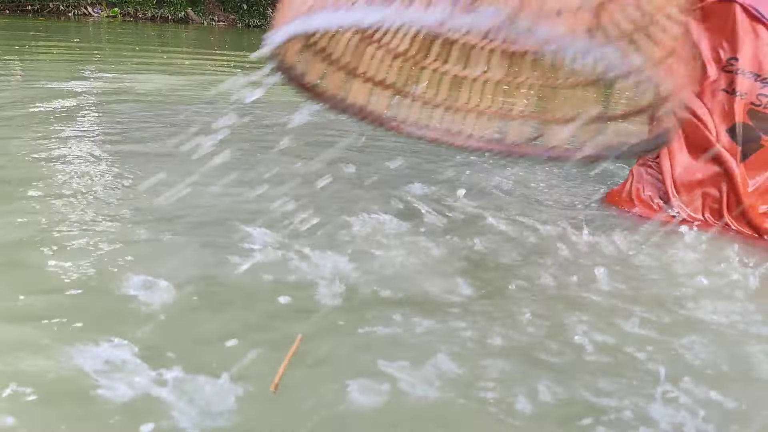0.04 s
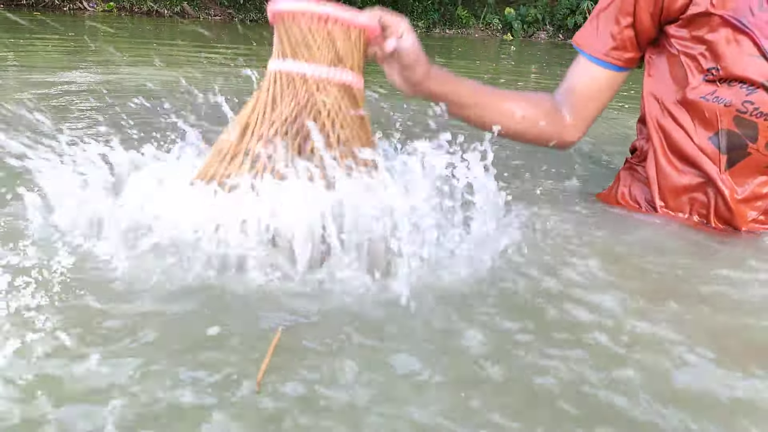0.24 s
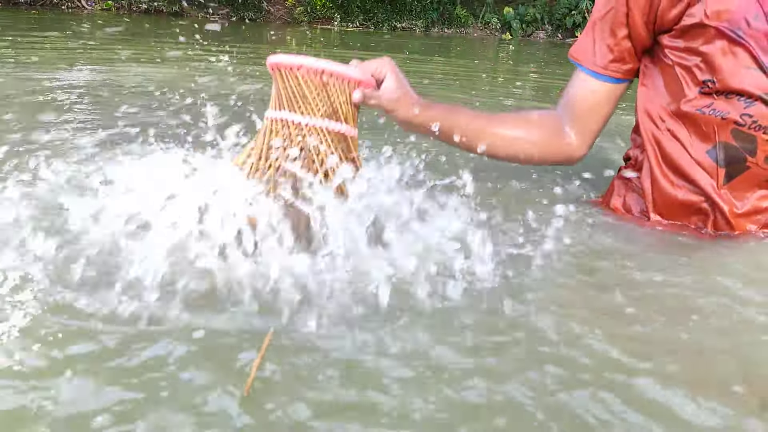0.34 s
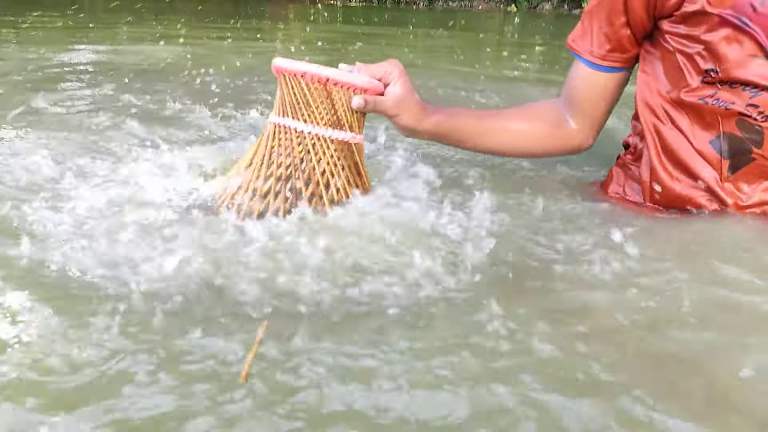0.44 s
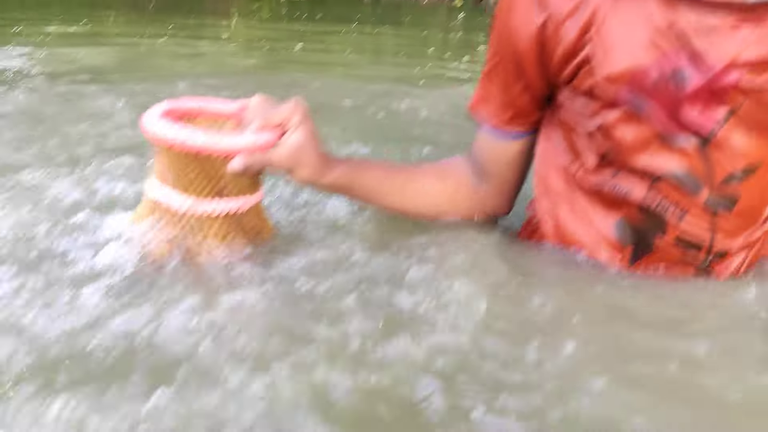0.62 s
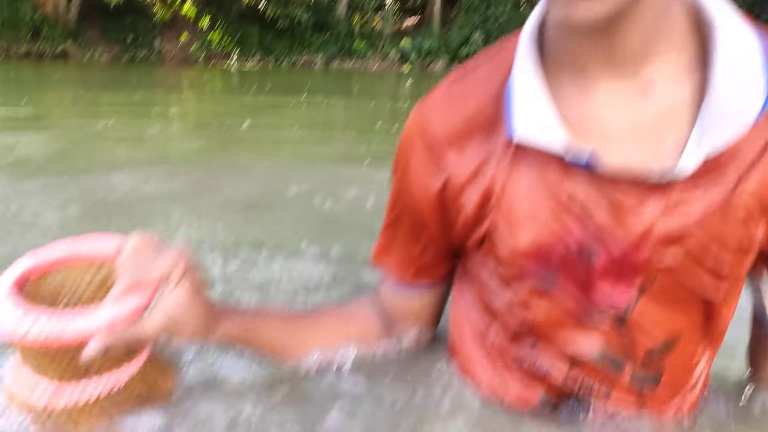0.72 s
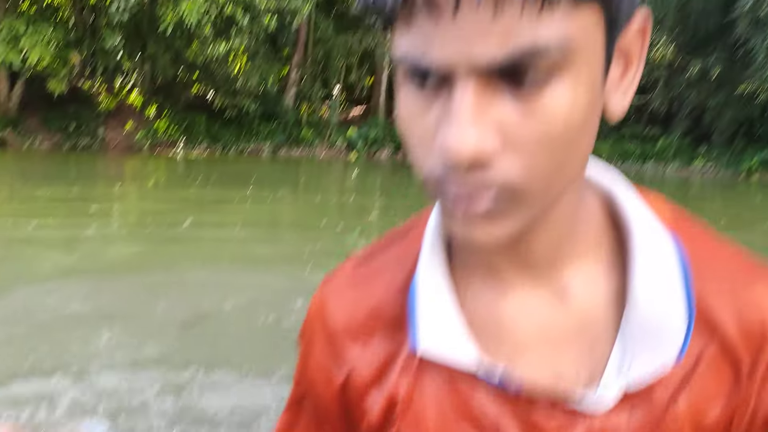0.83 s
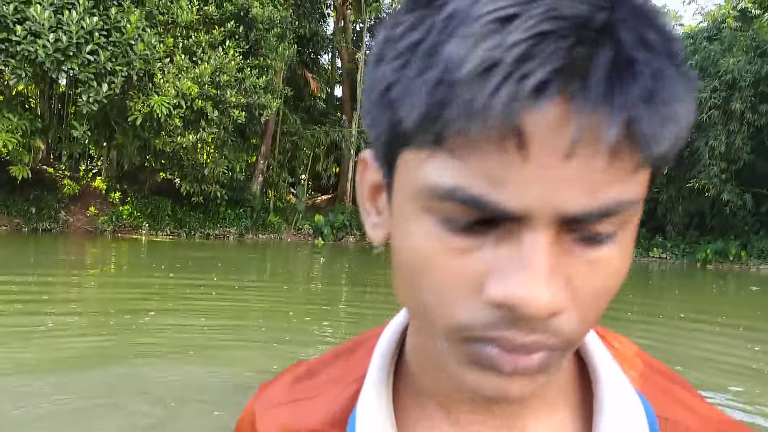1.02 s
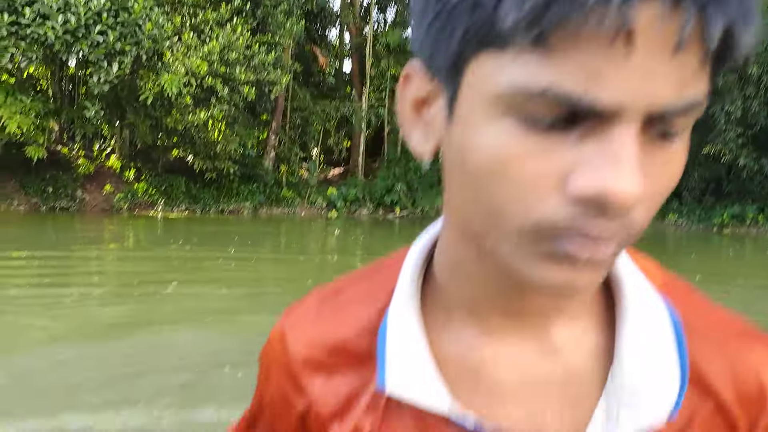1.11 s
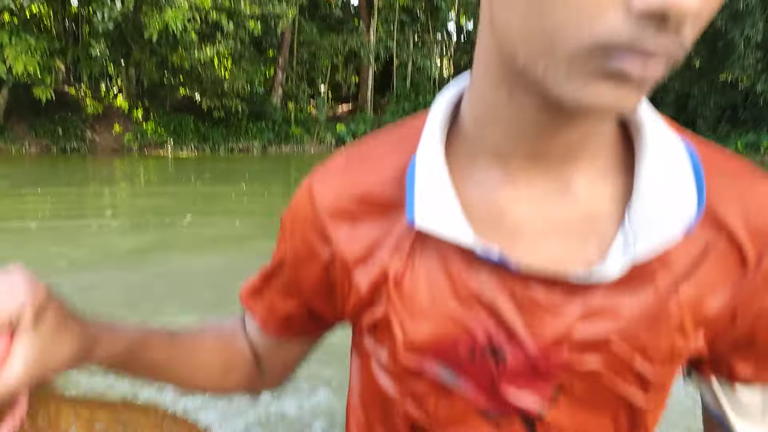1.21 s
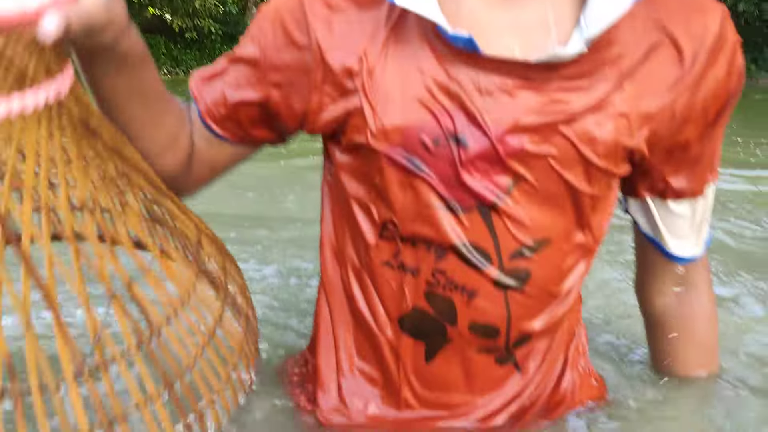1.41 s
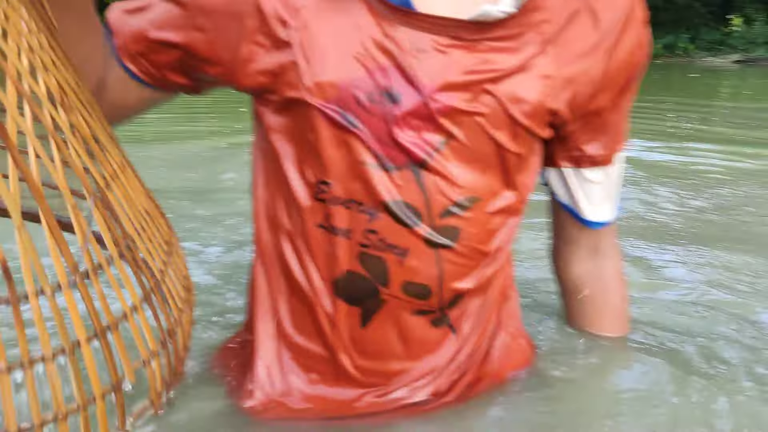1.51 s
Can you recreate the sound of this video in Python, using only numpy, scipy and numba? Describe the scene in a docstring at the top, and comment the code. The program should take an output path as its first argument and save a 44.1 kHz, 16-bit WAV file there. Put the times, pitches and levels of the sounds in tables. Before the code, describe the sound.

One brief, close splash as a bamboo basket is pushed into a shallow river, with bubbly plops and a sinking gulp, then fading foam, sparse droplets and soft draining over faint lapping; stereo phone, slight wind rumble.

```python
"""Basket trap plunged into a river

A bamboo basket trap is plunged into a shallow river, close to a phone with two microphone ports.
Spray, churning water, spray raining back, foam, trickles, draining and the river are clouds of tiny bubble rings.
Drips add a noisy tick to a ringing bubble, and an air pocket gulps shut as a sine that sinks in pitch.
Air buffets the ports as filtered noise with two low thumps."""
import sys
import numpy as np
from scipy import signal
from scipy.fft import rfft, irfft, next_fast_len
from scipy.io import wavfile
from numba import njit

SR = 44100
rng = np.random.default_rng(int(sys.argv[2]) if len(sys.argv) > 2 else 0)


def persist_wave(psi):
    """Save psi, clipped to +-1, as 16-bit WAV."""
    counts = np.round(np.clip(psi, -1, 1) * 32767).astype(np.int16)
    wavfile.write(sys.argv[1], SR, np.atleast_2d(counts).T)


N = 68355  # length in samples

# The river's steady lapping and far hiss. Each row: frequency in Hz, filter gain in dB.
RIVER_TONE = [(60, -4), (130, -1), (280, 5), (500, -4), (900, -8), (1600, -11), (3400, -4.5), (5000, -11.5),
              (8000, -11.5), (14000, -16.5)]
RIVER_DB, RIVER_FLICKER_DB = -56, 1

# Rumble of the air on the ports. Each row: frequency in Hz, filter gain in dB.
BUFFET_TONE = [(10, -12.5), (25, 2.5), (45, -7), (70, -7.5), (110, -10.5), (200, -23.5), (500, -76),
               (2000, -83)]
# How strongly air rumbles in the right port. Each row: time in seconds, level in dB.
BUFFET_RIGHT = [(0, -54), (.42, -48.5), (.5, -40.5), (.56, -36), (.595, -32.5), (.64, -46.5), (.9, -46),
                (1.15, -49.5), (1.4, -46), (1.55, -44.5)]
BUFFET_LEFT_DB = -54  # steady
# Puffs that strike the right port.
# Each row: start in seconds, pitch in Hz, level before filtering in dB, seconds to fade by 60 dB.
PUFFS = [(0.578, 59, -22.5, 0.069), (0.583, 248, -17, 0.0088)]

# Sparse gurgles and droplets after the plunge. Each row: frequency in Hz, filter gain in dB.
TRICKLE_TONE = [(150, -26), (300, -8), (550, -4), (850, 2), (1400, -6.5), (2200, -15.5), (3500, -1.5),
                (6000, -28), (14000, -22.5)]
TRICKLE_FROM_S, TRICKLE_RISE_S, TRICKLE_DB = .45, 0.051, -62.5
TRICKLE_CYCLES = 12.6  # base number of cycles a bubble rings

# Single drips and bubbles. Each row: start in seconds, pitch in Hz, level in dB,
# seconds for the ring to fade by 60 dB, level of the tick in dB relative to the ring (halved later).
DRIPS = [(.001, 2184, -43, 0.03, 10.5), (0.011, 3420, -44, 0.01, -2), (.057, 3840, -44, 0.02, 0),
         (0.07, 3280, -43.5, 0.011, 2), (.108, 3460, -42.5, .011, 0), (0.126, 3660, -43.5, .011, 5.5),
         (.135, 4200, -46, 0.014, 8.5), (0.141, 3040, -43.5, 0.021, 1), (0.164, 3600, -38, 0.012, -2),
         (0.166, 7400, -32.5, 0.01, -12), (0.19, 5670, -44, .006, 1), (.21, 3200, -29, 0.011, 2),
         (0.243, 4200, -23, 0.021, 1), (.286, 803, -11, 0.014, -30), (0.299, 1090, -16, 0.011, -16),
         (.418, 584, -28, 0.024, -5), (.483, 835, -29, 0.035, -32), (0.521, 8500, -36.5, 0.02, -17),
         (.53, 2600, -22, .017, -14), (.559, 6730, -33, 0.0075, -4), (.591, 483, -27.5, 0.022, -6.5),
         (0.683, 5500, -49, .008, 6), (.737, 700, -44.5, 0.038, -12), (.8943, 3350, -36.5, .012, -15),
         (.939, 3750, -43, 0.015, -2), (.994, 2920, -41, 0.015, -0.5), (1.007, 847, -42.5, .055, -20),
         (1.0702, 3600, -27, .011, -15), (1.12, 660, -50, .035, -22), (1.148, 700, -49.5, 0.056, -8),
         (1.186, 877, -46, 0.066, -11.5), (1.185, 1354, -48.5, 0.049, -10), (1.306, 265, -47.5, 0.085, -20),
         (1.307, 1150, -43.5, 0.016, -6), (1.403, 5500, -33, .009, -13), (1.444, 3380, -41, 0.031, 6)]
TICK_T60_S, DRIP_RISE_S = 0.021, .0009
DRIP_GLIDE = .25  # share by which a drip's pitch rises in its 60 dB fade time
DRIP_WOBBLE = .25  # depth of the uneven loudness

GULP_S, GULP_DB = .324, -15.5
GULP_START_HZ, GULP_END_HZ, GULP_SINK_S = 699, 229.8, 0.0058
GULP_RISE_S, GULP_DECAY_S = .004, .0125
GULP_WOBBLE = .2  # depth of the uneven loudness

BUBBLE_GLIDE = 0.079  # share by which a small bubble's pitch rises while it rings
# Stages of moving water: spray off the ribs, a thrown sheet of water, churning, the cavity collapsing,
# spray falling back, foam, draining through the weave.
# Each row: start in seconds, rise in seconds, hold in seconds, fall in dB per second, level in dB,
# spread of bubble strengths in dB, base number of cycles a bubble rings, burstiness in dB.
STAGES = [(0.198, .008, 0.15, 112, -40, 3, 6, -1), (0.217, 0.021, 0.073, 165, -39, 3, 9.5, 1.5),
          (0.253, .022, .057, 78, -27.5, 2, 21, 1.2), (.323, .004, .014, 400, -26, 1.5, 12, .4),
          (0.425, 0.033, 0.062, 289, -41, 2.5, 5.6, 0.7), (0.565, 0.068, .13, 16, -54.5, 3, 17, 2.85),
          (1.222, .21, .12, 6, -50.5, 1.5, 10, 1)]
# Colour of each stage, in the same order. Each row: frequency in Hz, filter gain in dB.
SPRAY_TONE = [(200, -65), (900, -20), (1800, -14.5), (3300, -1), (5500, -2.5), (9000, -9), (14000, -15.5)]
SHEET_TONE = [(200, -12), (700, -4), (1500, 2), (3300, -7), (5500, -4), (9000, -6), (14000, -10)]
CHURN_TONE = [(80, -40), (170, -9), (300, -9), (550, -4), (900, 2), (1400, -1), (2200, -7), (4000, -11),
              (7000, -22.5), (14000, -32.5)]
COLLAPSE_TONE = [(100, -23), (280, 7.5), (500, -15), (1000, 5), (2000, 1), (4000, -7), (8000, -17.5),
                 (14000, -24)]
FALLBACK_TONE = [(100, -12), (300, -5), (800, -6.5), (1600, 0.5), (2800, 0.5), (5000, -6.5), (9000, -9),
                 (14000, -16.5)]
FOAM_TONE = [(120, 6), (280, -1.5), (420, -11.5), (700, -10.5), (1050, 1.5), (1480, -15), (2200, 0),
             (3800, -7.5), (7000, -15), (14000, -25.5)]
DRAIN_TONE = [(120, 4.5), (280, -0.5), (600, -8), (1300, -1), (2500, 3.5), (4000, -4), (7000, -11),
              (14000, -22)]

# Colour of the two microphone ports. Each row: frequency in Hz, filter gain in dB.
LEFT_PORT = [(100, -1.5), (250, -2), (400, -2), (600, 0.5), (720, 1.5), (890, 1), (1000, -1), (1250, -1),
             (1500, -2.5), (2100, 0), (3000, -2.5), (4300, -4.5), (6000, 1), (8500, 4), (9900, -1.5),
             (13000, 6.5)]
RIGHT_PORT = [(100, -1), (180, -3), (250, 0.5), (450, -0.5), (650, -0.5), (900, -0.5), (1100, -1.5),
              (1400, 4.5), (1650, 5), (2000, 1.5), (3000, 0), (4400, 4), (6500, -1), (8400, -22.5),
              (9900, -8), (13500, 3.5)]
PORT_LAG_S, LAG_SPREAD_S = .00027, .00013  # the right port hears the water later
TOP_HZ = 14300  # the treble is cut above this


def undb(db):
    """Turn decibels into a gain."""
    return 10 ** (np.asarray(db) / 20)


def unit(x):
    """Scale to an rms (average strength) of one."""
    return x / np.sqrt(np.mean(x ** 2))


def colour(x, points):
    """Filter to a gain given as (Hz, dB) points, with no sound ahead of its cause."""
    hz, db = np.array(points, float).T
    size = 2 * next_fast_len(N)
    grid = np.maximum(np.arange(size // 2 + 1) * SR / size, 1)
    gain = undb(np.interp(np.log(grid), np.log(hz), db))
    # folding the cepstrum (the spectrum of the log gain) makes the filter minimum phase
    cepstrum = irfft(np.log(gain))
    cepstrum[1:size // 2] *= 2
    cepstrum[size // 2 + 1:] = 0
    response = np.exp(rfft(cepstrum))
    return irfft(rfft(x, size) * response)[..., :N]


def walk(count):
    """Draw a random line through about count points, with a spread of roughly one."""
    points = rng.standard_normal(count + 1)
    return np.interp(np.linspace(0, count, N), np.arange(count + 1), points)


def since(start):
    """Give the seconds since start at the left and right port, zero before."""
    lag = np.array([[0], [PORT_LAG_S]])
    return np.maximum(np.arange(N) / SR - start - lag, 0)


def ring(age, hz, t60, glide):
    """Ring as a fading sine; a glide above zero raises its pitch for up to twice t60."""
    bend = 1 + glide * np.minimum(age / t60, 2) / 2
    fade = np.exp(-np.log(1000) * age / t60)
    return np.sin(2 * np.pi * hz * age * bend) * fade


@njit
def grains(start, hz, cycles, size, glide):
    """Add up many small bubbles, each a sine that rises in pitch as it fades."""
    out = np.zeros(N)
    for k in range(len(start)):
        life = cycles[k] / hz[k]
        first = max(int(start[k] * SR) + 1, 0)
        last = min(int((start[k] + life) * SR), N)
        for i in range(first, last):
            age = i / SR - start[k]
            u = age / life  # share of its life gone by
            turns = hz[k] * age * (1 + glide * u / 2)
            out[i] += size[k] * np.exp(-5.8 * u) * np.sin(2 * np.pi * turns)
    return out


def bubbles(spread_db, cycles, count):
    """Scatter bubbles evenly in time; each reaches the right port with its own lag."""
    when, pitch, strength, length = rng.random((4, count))
    # 120 to 15000 Hz, spread evenly on a square-root scale
    low, high = np.sqrt(120), np.sqrt(15000)
    hz = (low + pitch * (high - low)) ** 2
    size = hz ** .75 * undb(-spread_db * np.log(1 - .985 * strength))
    start = when * N / SR
    lag = PORT_LAG_S + LAG_SPREAD_S * rng.standard_normal(count)
    life = max(cycles, 1.) * (.5 + 2 * length)  # in cycles
    return np.array([grains(start + late, hz, life, size, float(BUBBLE_GLIDE)) for late in (0, lag)])


def river():
    """Faint lapping and hiss all round: a dense bubble cloud whose level flickers."""
    cloud = unit(colour(bubbles(0.56, 4.3, count=30000), RIVER_TONE))
    return cloud * undb(RIVER_DB + RIVER_FLICKER_DB * walk(count=30))


def buffeting():
    """Moving air rumbles in each port on its own, as filtered noise; puffs thump the right one."""
    left, right = unit(colour(rng.standard_normal((2, N)), BUFFET_TONE))
    right_db = np.interp(np.arange(N) / SR, *np.array(BUFFET_RIGHT).T)
    thump = sum(undb(db) * ring(since(start)[1], hz, t60, 0) for start, hz, db, t60 in PUFFS)
    dull_thump = colour(thump, [(500, 3.5), (1000, -8), (4000, -35)])
    return np.array([left * undb(BUFFET_LEFT_DB), right * undb(right_db) + dull_thump])


def trickle():
    """Separate gurgles and droplets on the unsettled surface: a sparse bubble cloud."""
    fade_in = np.minimum(since(TRICKLE_FROM_S) / TRICKLE_RISE_S, 1)
    cloud = unit(colour(bubbles(2.7, TRICKLE_CYCLES, count=1300), TRICKLE_TONE))
    return undb(TRICKLE_DB) * fade_in * cloud


def drips():
    """Each drop ticks on the surface as a noise burst and leaves a wobbling, ringing bubble."""
    out = np.zeros((2, N))
    noise = rng.standard_normal((2, N))
    spatter = unit(colour(noise, [(500, -11), (3000, 0.5), (8000, -2), (14000, -10)]))
    wobble = 1 + DRIP_WOBBLE * walk(count=1400)
    for start, hz, db, t60, tick_db in DRIPS:
        age = since(start)
        tick = spatter * np.exp(-np.log(1000) * age / TICK_T60_S) / 2
        bubble = wobble * ring(age, hz, t60, DRIP_GLIDE)
        onset = 1 - np.exp(-age / DRIP_RISE_S)
        out += undb(db) * onset * (bubble + undb(tick_db) * tick)
    return out


def gulp():
    """The air pocket under the basket closes and rings unevenly, lower as it is pushed down."""
    age = since(GULP_S)
    # cycles so far, while the pitch slides from its start to its end
    slide = GULP_SINK_S * (1 - np.exp(-age / GULP_SINK_S))
    turns = GULP_END_HZ * age + (GULP_START_HZ - GULP_END_HZ) * slide
    envelope = (1 - np.exp(-age / GULP_RISE_S)) * np.exp(-age / GULP_DECAY_S)
    wobble = 1 + GULP_WOBBLE * walk(count=700)
    return undb(GULP_DB) * envelope * np.sin(2 * np.pi * turns) * wobble


def water(stage, tone):
    """One stage of the splash: a bubble cloud that swells, holds and dies away in small bursts."""
    start, rise, hold, fall, db, spread_db, cycles, gust_db = stage
    t = np.arange(N) / SR - start
    falling_db = fall * np.maximum(t - rise - hold, 0)
    level_db = db - falling_db + gust_db * walk(count=220)
    envelope = np.clip(t / rise, 0, 1) * undb(level_db)
    return envelope * unit(colour(bubbles(spread_db, cycles, count=10000), tone))


def scene():
    """Add the river, air, trickle, drips and gulp to the splash, from first spray to draining."""
    tones = [SPRAY_TONE, SHEET_TONE, CHURN_TONE, COLLAPSE_TONE, FALLBACK_TONE, FOAM_TONE, DRAIN_TONE]
    splash = sum(water(stage, tone) for stage, tone in zip(STAGES, tones))
    return river() + buffeting() + trickle() + drips() + gulp() + splash


def record(dry):
    """Each port colours the sound in its own way; the top is cut steeply."""
    ports = np.array([colour(dry[0], LEFT_PORT), colour(dry[1], RIGHT_PORT)])
    top_cut = signal.ellip(10, .2, 70, TOP_HZ, fs=SR, output="sos")
    return signal.sosfilt(top_cut, ports)


dry = scene()
out = record(dry)
persist_wave(out)
```